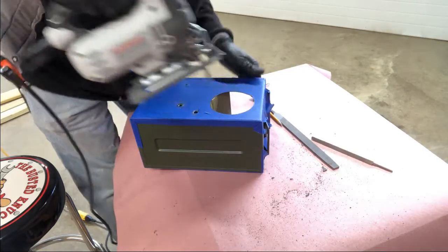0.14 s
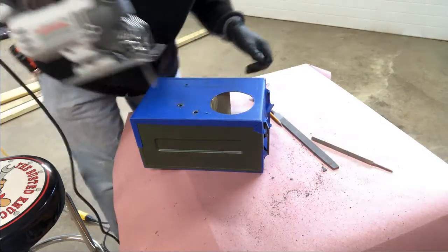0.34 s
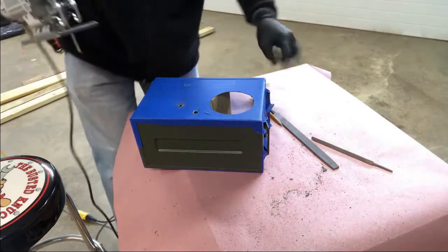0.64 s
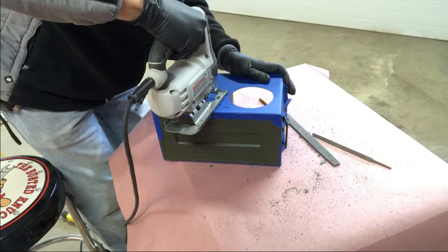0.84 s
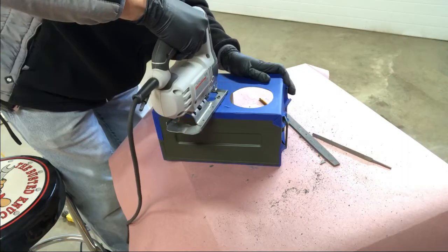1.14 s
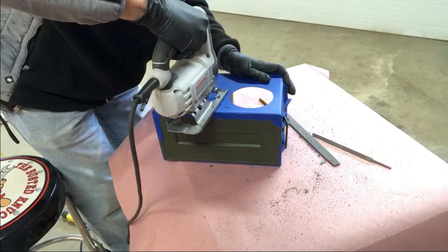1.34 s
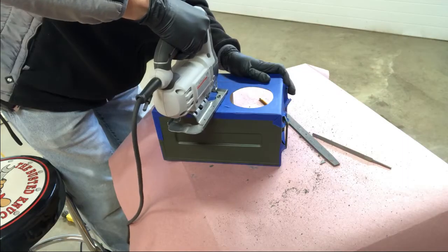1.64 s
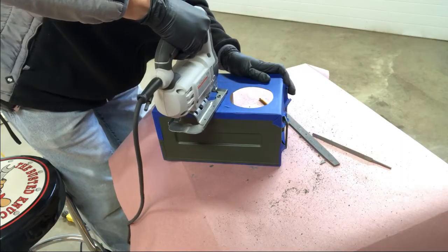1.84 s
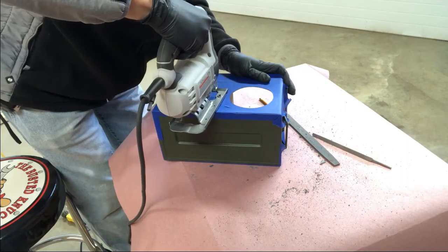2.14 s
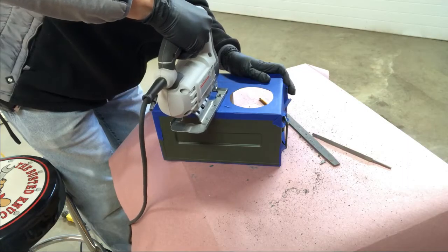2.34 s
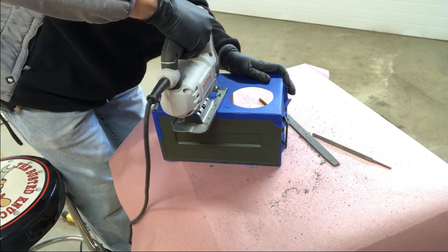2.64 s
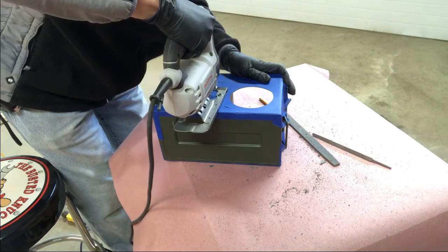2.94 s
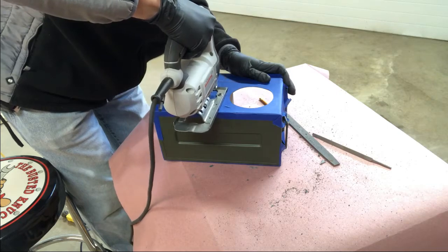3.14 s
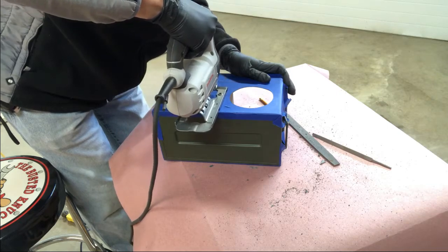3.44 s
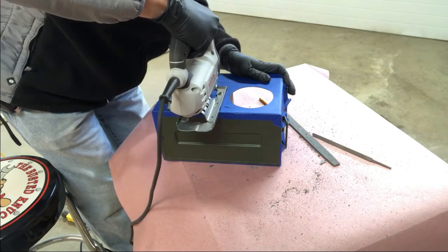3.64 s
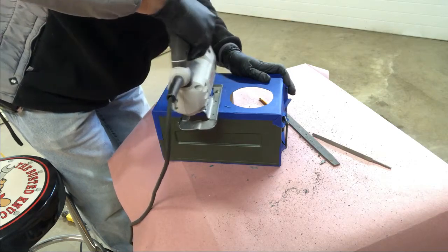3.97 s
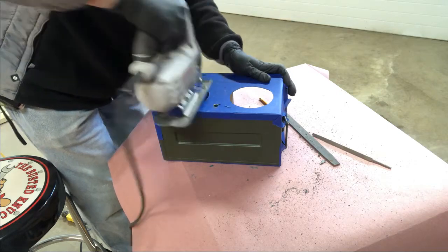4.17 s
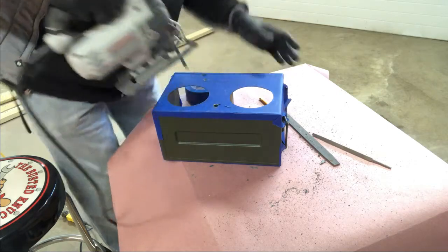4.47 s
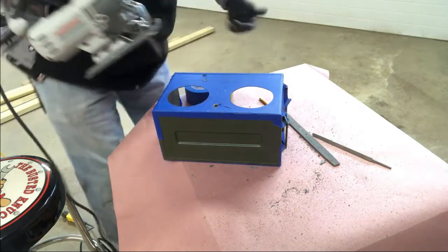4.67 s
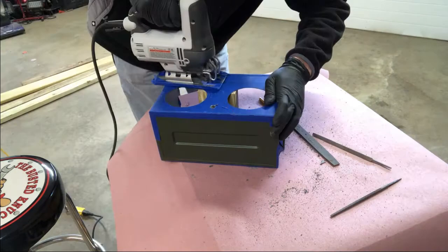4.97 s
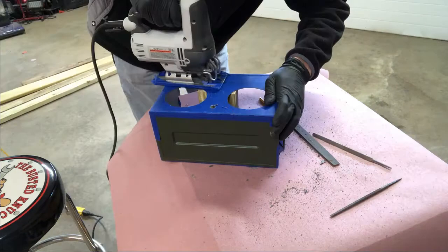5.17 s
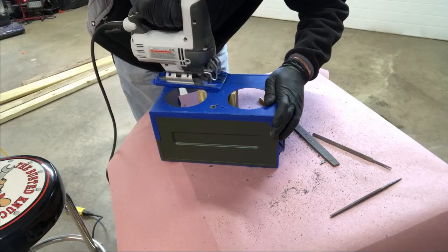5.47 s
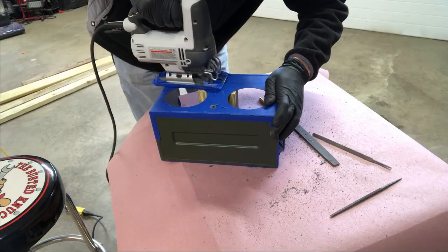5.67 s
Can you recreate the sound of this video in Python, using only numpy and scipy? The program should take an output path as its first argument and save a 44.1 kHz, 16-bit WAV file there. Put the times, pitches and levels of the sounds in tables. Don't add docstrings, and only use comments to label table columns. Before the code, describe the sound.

A corded jigsaw winds down with ticking and dry squeal, then buzzes loudly through a thin steel box in three hard-joined bursts, coasting once more between.

```python
import sys
import numpy as np
from scipy import signal
from scipy.fft import rfft, irfft, next_fast_len
from scipy.io import wavfile
from scipy.ndimage import uniform_filter1d

SR = 44100
rng = np.random.default_rng(int(sys.argv[2]) if len(sys.argv) > 2 else 0)


def materialize(psi):
    bounded = np.clip(np.atleast_2d(psi).T, -1, 1)
    quanta = np.round(bounded * 32767).astype(np.int16)
    wavfile.write(sys.argv[1], SR, quanta)


def gain_from_decibels(decibels):
    exponent = np.asarray(decibels, float) / 20
    return 10 ** exponent


N = 256220

# start_s, strokes_hz, feed_db
FEED_A = [(.76, 42.9, 0.5), (.88, 42.6, .3), (.966, 42.4, 0), (1.37, 42.25, -1.5), (1.648, 42.42, -3),
          (1.8, 42.6, -2), (2.144, 42.7, -1.5), (2.456, 42.5, -2.5), (2.558, 42.7, -5.5), (2.575, 42.7, -4)]
LAYERS_A = (-55.5, -44, -45.5, -44.5)
# pitch_hz, width_hz, level_db
BOX_A = [(465.2, 15.6, -8), (826, 37, -12), (1090, 50, -8), (1500, 100, -7.5), (1666, 120, -3.5),
         (1810, 82, -2), (2180, 120, -6.5), (2740, 120, -3), (3210, 94, -9), (4280, 66, -9),
         (5090, 370, -13.5), (7850, 320, -15.5), (10400, 440, -18), (14700, 500, -17)]
# pitch_hz, level_db (per Hz)
SHEET_A = [(24, -66), (40, -49.5), (392, -16.5), (467, -23.5), (680, -28.5), (1720, 2.5), (2380, -20.5),
           (2770, -4), (3650, -10), (7730, -14), (16000, -24)]
# stroke_place (0-1), boom_db, sheet_ring_db, upper_ring_db
BITES_A = [(.02, 0, -6, 1), (.11, -2, 4, -5), (.37, 0, 1, -4), (.45, -5.5, -1, -.5), (.57, 5, -1, -5),
           (.7, 3, 0, -6), (.87, -8, .5, -2), (.94, -8, -8, 1.5)]
# stroke_place (0-1), pitch_hz, rise_ms, level_db (re the ring of its range)
STRIKES_A = [(.04, 1730, 1.6, 8.5), (.87, 2725, 2.6, 10.5), (.05, 1500, 1.7, 5), (.41, 3300, 1.4, 1),
             (.39, 2200, 1.2, 2), (.47, 1850, 1.3, 3)]
# stroke_place (0-1), width (0-1 stroke), level_db
SPRAY_A = [
    (.44, 0.13, 8.5),
    (.99, 0.2, 9),
]
# centre_s, width_s, pitch_hz, width_hz, level_db
SHIFTS_A = [(.78, 0.092, 1820, 130, -8), (2, 0.46, 1790, 120, -3), (.95, 0.34, 1470, 160, 5),
            (2.8, .45, 1540, 160, -5.5), (0.87, 0.42, 1340, 180, -5), (1.2, 0.3, 1105, 90, 4.5),
            (2.1, .45, 1090, 60, -2.5), (2.53, .04, 300, 400, 4), (.748, .012, 1700, 2000, -4),
            (2.44, .15, 830, 100, 3.5), (1.74, .05, 790, 60, 8), (2.33, 0.4, 2080, 220, 4),
            (2.1, 0.21, 2800, 290, -1.5), (1.4, 0.22, 2720, 250, 1.5), (0.96, 0.17, 460, 100, 4),
            (1.8, 0.15, 430, 76, -3), (2.26, 0.07, 3270, 180, 3.5), (1.3, .4, 280, 190, -4),
            (2.1, .3, 140, 80, 3), (2.45, .08, 1150, 300, 4), (2.4, .12, 2750, 300, 3)]
# pitch_hz, width_hz, [(stroke_place (0-1), level_db)]
SWELLS_A = [(1000, 500, [(.2, 4), (.9, -6), (.62, -3)]), (1450, 250, [(.68, -5), (.42, -3)]),
            (1800, 300, [(.48, -5), (.62, 3)]), (2750, 450, [(.44, -6), (.98, 2)]), (3250, 400, [(.49, -3)]),
            (12000, 6000, [(.42, 2.5), (.17, -2)])]
# multiple (of stroke rate), level_db
THUMP_A = [(1, -37), (2, -65), (3, -13), (4, -24), (5, -5), (6, -6.5), (7, -9), (8, -5), (9, -24),
           (10, -7.5), (11, 6), (42, 4)]


def first_cut():
    return cut(.7455, 2.586, FEED_A, LAYERS_A, BOX_A, SHEET_A, BITES_A, STRIKES_A, SPRAY_A, SHIFTS_A,
               SWELLS_A, THUMP_A, thump_db=-6.5, alike=0.65, between=.33, under_db=-5.5)


# start_s, strokes_hz, feed_db
FEED_B = [(2.595, 42.5, -1.5), (2.663, 42.87, 0.5), (2.827, 42.87, -0.5), (2.953, 42.83, 0.2),
          (3.319, 42.87, -1.3), (3.531, 43.25, -5), (3.59, 43.58, -8), (3.629, 43.16, -18),
          (3.68, 42.85, -26)]
LAYERS_B = (-53.5, -41, -46, -43)
# pitch_hz, width_hz, level_db
BOX_B = [(440, 23, -7), (1197, 32, -9), (1470, 40, -3), (1758, 29, -2), (2250, 21, -8), (2520, 110, -20),
         (2736, 88, -10), (3114, 26, -3), (3970, 260, -13), (5120, 310, -12), (6780, 110, -26),
         (8500, 150, -25), (10100, 290, -19), (14800, 300, -24)]
# pitch_hz, level_db (per Hz)
SHEET_B = [(24, -89), (40, -65), (363, -6.5), (422, -3.5), (600, -15), (1180, -7.5), (1340, -21),
           (1810, -2), (2380, -11.5), (5180, -12), (16000, -21.5)]
# stroke_place (0-1), boom_db, sheet_ring_db, upper_ring_db
BITES_B = [(.03, 2, -3, -2.5), (.09, .5, -1, -9), (.18, -6, 5, -5), (.34, 1.5, 2.5, -6),
           (.48, -3.5, -1, -8), (.68, -9, -6, -1), (.78, -9, 2, 0), (.9, -3, 7, 0)]
# stroke_place (0-1), pitch_hz, rise_ms, level_db (re the ring of its range)
STRIKES_B = [(.1, 1480, 1.5, 5), (.83, 1760, 1.5, 3), (.84, 1480, 1.3, 3), (.29, 1780, 1.4, 3),
             (.72, 5200, 1.3, -2), (.72, 3150, 1.3, -2)]
# stroke_place (0-1), width (0-1 stroke), level_db
SPRAY_B = [
    (.21, 0.071, 6.8),
    (.77, 0.11, 6.9),
]
# centre_s, width_s, pitch_hz, width_hz, level_db
SHIFTS_B = [(2.74, 0.14, 1210, 190, 2), (3.43, .08, 1220, 250, 4.5), (2.85, .3, 1770, 90, -5.5),
            (3.5, .15, 1770, 90, -3), (3.15, .3, 1456, 70, 5), (3.2, .12, 560, 150, -3),
            (2.6, 0.12, 2260, 250, 3.5), (3.37, 0.25, 3120, 180, -4.5), (3.07, 0.4, 440, 120, -2.5),
            (3.46, 0.11, 410, 100, 5.5), (2.66, .1, 1460, 250, -3), (3.1, .6, 110, 90, -6),
            (2.64, .08, 240, 100, 5), (3.4, .15, 320, 100, 3), (2.62, .06, 3120, 150, -5)]
# pitch_hz, width_hz, [(stroke_place (0-1), level_db)]
SWELLS_B = [(440, 350, [(.06, 3), (.89, -6), (.56, -3)]), (1000, 500, [(.53, -6), (.14, 2)]),
            (1450, 250, [(.41, -9), (.12, 4), (.94, -3), (.75, 2)]), (1800, 300, [(.96, -7), (.57, 8),
            (.2, 4), (.72, 3)]), (2750, 450, [(.18, -4), (.44, 5), (.76, -5)])]
# multiple (of stroke rate), level_db
THUMP_B = [(1, -47), (2, -42), (3, -34), (4, -22), (5, -16), (6, -18), (7, -15), (8, -5), (9, -9), (10, 8),
           (11, 8.5), (28, -9), (34, 5.5), (41, 0), (43, -2), (73, -4)]


def second_cut():
    return cut(2.586, 3.68, FEED_B, LAYERS_B, BOX_B, SHEET_B, BITES_B, STRIKES_B, SPRAY_B, SHIFTS_B,
               SWELLS_B, THUMP_B, thump_db=-6.0, alike=0.82, between=0.45, under_db=-6.5)


# start_s, strokes_hz, feed_db
FEED_C = [(4.925, 30.34, 0.55), (5.001, 30.28, -.5), (5.227, 30.35, 0.074), (5.4, 30.41, -0.048),
          (5.79, 30.12, -.3)]
LAYERS_C = (-48.5, -39, -41.5, -41)
# pitch_hz, width_hz, level_db
BOX_C = [(342, 22, -3), (818, 26, -9), (995, 27, -5), (1382, 21, 1.5), (1587, 77, -2), (1983, 53, -4.5),
         (2210, 37, -13.5), (2626, 66, -12.5), (3150, 96, -13.5), (3400, 56, -16), (4450, 110, -15),
         (4980, 94, -13), (6070, 340, -17), (7690, 340, -17)]
# pitch_hz, level_db (per Hz)
SHEET_C = [(24, -70), (40, -41), (204, -8.5), (467, -3), (570, -17), (831, -1.5), (1090, -11.5), (1590, 0),
           (1810, -13.5), (3140, -12), (16000, -19.5)]
# stroke_place (0-1), boom_db, sheet_ring_db, upper_ring_db
BITES_C = [(.08, 6.5, -1, -2.5), (.2, -1, 1, -3), (.3, 12.5, 7.5, 3), (.4, 3, 3.5, 3), (.55, 4.5, 3.5, 1),
           (.68, -15, -5, -5), (.78, -14, -3, -1), (.87, -6, -4, 4.5)]
# stroke_place (0-1), pitch_hz, rise_ms, level_db (re the ring of its range)
STRIKES_C = [(.26, 1390, 1.6, 0), (.25, 1600, 2.4, 4), (.33, 990, 2, 0), (.83, 3200, 1.1, 0),
             (.5, 1590, 2, 2)]
# stroke_place (0-1), width (0-1 stroke), level_db
SPRAY_C = [
    (.38, 0.067, 8.1),
    (.79, 0.059, 8.6),
    (.96, .05, 6.1),
]
# centre_s, width_s, pitch_hz, width_hz, level_db
SHIFTS_C = [(4.98, .12, 980, 160, -2), (5.26, 0.44, 675, 140, 3), (5.7, .6, 330, 97, -4),
            (5.67, 0.16, 1800, 130, -10), (5.35, .18, 1600, 90, 4), (5.7, .08, 1600, 120, -3),
            (5.5, .3, 995, 90, 2.5), (5.3, .6, 150, 60, 2.5), (5, .1, 1900, 200, -3),
            (5.5, .2, 2040, 180, -2), (5.2, 0.39, 830, 110, -1.5), (5.7, .12, 845, 100, -4),
            (5.4, .15, 1750, 400, 3)]
# pitch_hz, width_hz, [(stroke_place (0-1), level_db)]
SWELLS_C = [(950, 500, [(.5, 4), (.63, 3), (.84, -5), (.99, 4)]), (1450, 250, [(.22, 3), (.37, -3), (.87, -4),
            (.04, 3)]), (1800, 300, [(.27, 3), (.6, -6), (.46, 4)]), (2750, 450, [(.22, 5), (.35, -4),
            (.5, 5), (.88, -2)]), (3250, 400, [(.09, -7), (.36, 3), (.6, -8), (.93, -4)]),
            (6000, 4000, [(.21, 3)]), (12000, 6000, [(.6, -2), (.78, 2.5), (.1, -3)])]
# multiple (of stroke rate), level_db
THUMP_C = [(1, -28), (2, -13), (3, -22), (4, -20), (5, -4.5), (6, -15), (7, -3), (8, -15), (9, -32),
           (10, -10), (11, 1.5), (12, -13), (13, -18), (28, -13), (45, -1.5), (46, 0.5), (53, 0)]


def third_cut():
    return cut(4.912, 5.82, FEED_C, LAYERS_C, BOX_C, SHEET_C, BITES_C, STRIKES_C, SPRAY_C, SHIFTS_C,
               SWELLS_C, THUMP_C, thump_db=-4.5, alike=0.68, between=0.52, under_db=-6.5)


BANDS_HZ = (110, 700, 2200, 4000, 17000)


def cut(t0, t1, rows, layers, box, sheet, bites, struck, spray, shifts, swells, thump,
        thump_db, alike, between, under_db):
    t = seconds(t0, t1)
    rate, levels = feed(rows, layers, t)
    phase = np.cumsum(rate) / SR
    places = round(SR / rate.mean())
    teeth = colour(blade_teeth(phase, places, alike), sheet, box, under_db)
    wander = phase + 0.0046 * drift(len(t), 3.5)
    chips = colour(chip_spray(wander, spray), sheet, box, under_db)
    shot = np.zeros(len(t))
    bite_width, fresh_chips = (.04, .032, .038, .03), (.55, .36, .5, 4.0)
    for k, (width, fresh) in enumerate(zip(bite_width, fresh_chips)):
        low, high = BANDS_HZ[k:k + 2]
        bite_rows = [(bite[0], width, gain_from_decibels(bite[min(k, 2) + 1])) for bite in bites]
        gate = between + humps(wander, bite_rows)
        ring = rms_one(gate * evened(band(teeth, low, high), size=places // 8))
        layer = band(ring + fresh * band(chips, low / 2, high), low * 0.79, high * 1.156)
        shot += gain_from_decibels(levels[k]) * evened(layer, size=2 * places)
    shot += strikes(phase, rate, levels, struck)
    shot += shoe_thumps(t, phase, levels, thump, thump_db, struck[0][0])
    return placed(shifted(swelling(shot, phase, swells), t, shifts), t)


def blade_teeth(phase, places, alike):
    alike = np.clip(alike, 0, .98)
    draws = rng.standard_normal((100, 1500))
    wear = rfft(draws[0, :places])
    wear = rms_one(irfft(wear / np.abs(wear), places))
    teeth = signal.lfilter([np.sqrt(1 - alike ** 2)], [1, -alike], draws[:, :places], axis=0)[15:]
    teeth += 1.4 * wear
    return teeth[phase.astype(int), (phase % 1 * places).astype(int)]


def chip_spray(wander, spray):
    size = len(wander)
    chips = rng.standard_normal(size) * gain_from_decibels(humps(wander, spray) + 0.76 * drift(size, 89.8))
    return chips * gain_from_decibels(2.44 * np.minimum(rng.exponential(1, size), 5))


def strikes(phase, rate, levels, rows):
    out = 0
    for (at, hz, rise_ms, db), chance in zip(rows, rng.standard_normal((8, 2, 100))):
        stroke, since = np.divmod(phase - at + 1, 1)
        uneven, detune = chance[:, stroke.astype(int)]
        since = since / rate
        rises = since / rise_ms * 1000
        swell = (rises * np.exp(1 - rises)) ** 2
        ring_db = levels[1 if hz <= BANDS_HZ[2] else 2]
        tone = np.sin(2 * np.pi * hz * since + 0.42 * detune)
        out = out + gain_from_decibels(ring_db + db + 1.1 * uneven) * swell * tone
    return out


def shoe_thumps(t, phase, levels, thump, thump_db, first_strike):
    throb = .6 * np.cos(2 * np.pi * (phase - first_strike))
    out = 0
    for (k, db), start in zip(thump, rng.random(30)):
        locked = k >= 20
        level_db = levels[1 if locked else 0] + db + thump_db + 2.64 * drift(len(t), 4.45)
        out = out + gain_from_decibels(level_db) * (1 + locked * throb) * np.sin(2 * np.pi * (k * phase + start))
    return out


FOLLOWS = (0.74, 0.88, 0.97, 0.83)
# centre_s, width_s, boom_db, sheet_ring_db, upper_ring_db (if it changes)
JUDDERS = [
    (0.882, 0.024, 3.1, 0.8),
    (2, 0.33, 2.5, -0.2),
    (2, 0.087, -0.5, 1.5),
    (2.5, 0.03, -13, 0),
    (2.5, 0.06, 6.5, -1),
    (3.59, 0.044, 8.1, 2.9),
    (2.5, 0.15, .3, 1, -5),
    (2, 0.23, -0.5, -2),
    (5, 1, 0, -1),
]


def feed(rows, layers, t):
    rate, press_db = in_time(rows, t)
    levels = [db + share * press_db for db, share in zip(layers, FOLLOWS)]
    for s, width, *extra_db in JUDDERS:
        for k, db in enumerate(extra_db):
            levels[k] = levels[k] + db * np.exp(-.5 * ((t - s) / width) ** 2)
    return rate, levels


def swelling(x, phase, rows):
    for hz, width_hz, places in rows:
        gain_db = humps(phase, [(at, .045, db) for at, db in places])
        x = x + (gain_from_decibels(gain_db) - 1) * resonance(x, hz, width_hz)
    return x


def shifted(x, t, rows):
    for s, width, hz, width_hz, db in rows:
        gain_db = db * np.exp(-.5 * ((t - s) / width) ** 2)
        x = x + (gain_from_decibels(gain_db) - 1) * resonance(x, hz, width_hz)
    return x


def working_gear():
    t = seconds(.7455, 2.586)
    strokes = np.cumsum(in_time(FEED_A, t)[0]) / SR
    return placed(whine(t, strokes, -70.0, rough=0.65), t)


# start_db, slope_db_per_s
COAST_A = [
    (-46.5, -16),
    (-10, -12),
    (-73, -10),
    (-54, -9),
]
# pitch_hz, level_db (per Hz)
MOTOR_A = [(24, -72), (40, -51), (297, -15), (363, -15.5), (770, -8), (1020, -13), (1630, -4), (2100, -8),
           (3650, -6), (4340, -8.5), (8990, -13), (12500, -14), (16000, -19)]
# start_s, end_s, from_hz, to_hz, level_db
RUBS_A = [(-.15, .18, 4300, 3480, -52), (.18, .3, 3500, 3350, -62), (0.4, 0.66, 7200, 8200, -64),
          (0.69, 0.74, 7100, 6300, -62), (.585, 0.624, 7200, 6100, -61), (.4, 0.49, 10500, 10300, -60),
          (0.5, 0.51, 10400, 10300, -59), (.39, 0.5, 8900, 7700, -64), (.485, .52, 9400, 7100, -65),
          (-.1, 0.3, 9800, 9900, -62), (-.05, .3, 7850, 7700, -61)]


def first_coast():
    t = seconds(0, .7455)
    at = np.array(KNOCKS)[:, 0]
    strokes = np.polyval(np.polyfit(at, np.arange(len(at)), 3), t)
    return coast(COAST_A, t, t, 1, strokes, MOTOR_A, RUBS_A, throb_db=5.7, squeal_throb_db=24.0,
                 bright_db=6.0, under_db=19.0)


# start_db, slope_db_per_s
COAST_B = [
    (-53.2, -3.2),
    (-7, -4),
    (-64.5, -3),
    (-81, 14),
]
# pitch_hz, level_db (per Hz)
MOTOR_B = [(24, -90), (40, -58), (363, -8.5), (585, -7.5), (680, -4.5), (1070, -3.5), (1590, -11),
           (2000, -5), (2260, -3.5), (4130, -1.5), (7360, -15.5), (9690, -10), (16000, -19.5)]
# start_s, end_s, from_hz, to_hz, level_db
RUBS_B = [
    (3.62, 3.93, 410, 375, -63),
    (3.86, 4.05, 10000, 9400, -65),
    (4.6, 4.78, 4600, 4200, -61),
    (3.9, 4.45, 4250, 4050, -62),
    (3.64, 4.2, 1100, 960, -62.5),
    (4.19, 4.37, 700, 680, -67),
]
# centre_s, width_s, pitch_hz, width_hz, level_db
SHIFTS_COAST = [
    (3.72, .08, 1100, 400, 3),
    (3.7, .07, 200, 200, 5),
    (4.15, .2, 220, 250, -5),
    (4.55, .15, 450, 300, 4),
    (4.75, .2, 1050, 400, -5),
    (4.75, .15, 2900, 1000, -2),
    (4.6, .25, 7750, 400, 6),
    (4.3, .06, 9600, 400, 4),
    (3.9, .2, 90, 80, -6),
]


def second_coast():
    t = seconds(2.586, 4.912)
    since = np.maximum(t - 3.669, 0)
    mesh_hz, friction_hz, drag_per_s = 2935, 1325, .416
    mesh_hz = (mesh_hz + friction_hz) * np.exp(-drag_per_s * since) - friction_hz
    strokes = np.cumsum(mesh_hz) / SR / MESH_PER_STROKE + .07
    dry_from_s, dry_rise_s = 4.412, .012
    dry_guide = np.clip((t - dry_from_s) / dry_rise_s, 0, 1)
    x = coast(COAST_B, t, since, dry_guide, strokes, MOTOR_B, RUBS_B, throb_db=2.0 + 2.8 * since,
              squeal_throb_db=21.0, bright_db=3.0, under_db=4.5)
    return shifted(x, seconds(0, 6), SHIFTS_COAST)


def coast(rows, t, since, dry_guide, strokes, motor, rubs, throb_db, squeal_throb_db, bright_db, under_db):
    motor_db, low_db, whine_db, squeal_db = [db + slope * since for db, slope in rows]
    half = (2 * strokes) % 1
    travel = np.minimum(half / 0.048, 1) * (1 - half ** 1.8)
    travel = travel * (1 + 0.051 * np.cos(2 * np.pi * strokes - .8))
    air = colour(rng.standard_normal(len(t)), motor, HOUSING, under_db)
    brightness = gain_from_decibels(bright_db * (.5 - strokes % 1))
    air += (brightness - 1) * resonance(air, 11500.0, 7000.0)
    x = gain_from_decibels(motor_db) * rms_one(gain_from_decibels(throb_db * travel) * band(air, low=900, high=17000))
    x += gain_from_decibels(motor_db + low_db) * band(air, 16, 785)
    x += dry_guide * guide_squeal(t, strokes, squeal_db, squeal_throb_db)
    for rub in rubs:
        x += gliding_tone(t, strokes, *rub)
    return placed(x + whine(t, strokes, whine_db, rough=.65), t)


MESH_PER_STROKE = 68.4
# pitch_hz, width_hz, level_db
HOUSING = [(700, 200, -8), (1000, 330, -7), (1550, 300, 2), (1900, 300, 1), (2700, 260, -9),
           (4200, 350, -4), (5300, 800, -3), (6500, 400, -3), (7750, 250, -8), (8600, 500, -1),
           (9650, 300, -6)]
MESH_DB = (2.5, 0, 4.5)


def whine(t, strokes, level_db, rough):
    mesh_hz = MESH_PER_STROKE * np.gradient(strokes) * SR
    out = 0
    for k, db in enumerate(MESH_DB, 1):
        shake = 1 + rough * drift(len(t), 120.0) + .4 * np.cos(8 * np.pi * strokes)
        shake += .35 * np.cos(2 * np.pi * (strokes - .14))
        jitter = .5 * np.cumsum(drift(len(t), 250.0)) * 250 / SR
        turn = 2 * np.pi * k * MESH_PER_STROKE * strokes + jitter
        out = out + gain_from_decibels(db) * peaks_power(HOUSING, k * mesh_hz) ** 0.63 * shake * np.sin(turn)
    return gain_from_decibels(level_db) * out


# start_s, pitch_hz
SQUEAL = [
    (0, 13100),
    (.74, 13050),
    (4.4, 13200),
    (4.91, 12900),
]
# start_s, level_db
GRIP = [(0, 0), (.2, 0), (.24, -5), (.27, -3), (.31, 4), (.345, -2), (.38, 1), (.42, 4), (.46, -3), (.5, 5),
        (.55, -1), (.6, -3), (.64, -9), (.665, -2), (.71, -3), (.74, -1), (4.425, 6), (4.45, -7),
        (4.49, -3), (4.53, 1), (4.56, -5), (4.585, 2), (4.61, -4), (4.68, 1), (4.75, -3), (4.88, 2)]


def guide_squeal(t, strokes, level_db, depth_db):
    grip_db = in_time(GRIP, t)[0]
    pitch_hz = in_time(SQUEAL, t)[0]
    return gain_from_decibels(level_db + 0.5 + grip_db) * squeal(t, strokes, pitch_hz, 0.058, 0.015, depth_db)


def gliding_tone(t, strokes, start, end, from_hz, to_hz, level_db):
    along = np.clip((t - start) / (end - start), 0, 1)
    swell = np.sqrt(np.sin(np.pi * along) + 1e-9)
    pitch_hz = from_hz + (to_hz - from_hz) * along
    return gain_from_decibels(level_db) * swell * squeal(t, strokes, pitch_hz, .008, .014 + 70 / to_hz, 16.0)


def squeal(t, strokes, hz, wobble, scatter, depth_db):
    size = len(t)
    travel = np.abs(np.sin(2 * np.pi * strokes + 0.2 * drift(size, 11.0)))
    speed = np.tanh(2.2 * travel)
    pitch = hz * (1 - wobble * speed + scatter * drift(size, 900.0))
    flutter_db = 2 * drift(size, 110.0) + 1.6 * drift(size, 26.0) + 1.2 * drift(size, 11.0)
    grip = gain_from_decibels(1.3 * depth_db * .85 * speed + flutter_db)
    return rms_one(grip * np.sin(2 * np.pi * np.cumsum(pitch) / SR))


# start_s, level_db (peak)
KNOCKS = [(0.0218, -50), (0.0769, -36), (0.1362, -44), (0.1952, -40), (0.254, -30), (0.325, -32),
          (0.399, -38), (0.481, -35), (0.5734, -44), (0.68, -35)]
# start_s, level_db (peak)
TICKS = [
    (4.605, -43),
    (4.768, -47),
]


def knocks():
    out = np.zeros(N)
    events = KNOCKS + TICKS
    bursts = rng.standard_normal((len(events), 600)) * np.exp(-np.arange(600) / (0.0022 * SR))
    for (s, db), tick in zip(events, bursts):
        out[round(s * SR):][:600] += gain_from_decibels(db - 6.0) * tick
    return signal.sosfilt(signal.butter(2, [1200, 12000], "band", fs=SR, output="sos"), out)


# pitch_hz, level_db (per Hz)
ROOM = [(20, -25), (60, -15), (95, -12), (140, -7.5), (1000, -16), (16000, -27)]


def room_tone():
    return gain_from_decibels(-80) * rms_one(colour(rng.standard_normal(N), ROOM, [(95, 34, -16.0)], 0))


def rms_one(x):
    return x / np.sqrt(np.mean(x ** 2) + 1e-20)


def in_time(rows, t):
    s, *columns = np.transpose(rows)
    return [np.interp(t, s, c) for c in columns]


def seconds(t0, t1):
    return np.arange(round(t0 * SR), min(round(t1 * SR), N)) / SR


def placed(x, t):
    out = np.zeros(N)
    out[round(t[0] * SR):][:len(t)] = x
    return out


def peaks_power(peaks, hz):
    return sum(gain_from_decibels(2 * db) / (1 + (2 * (hz - f) / w) ** 2) for f, w, db in peaks)


def colour(x, spectrum, peaks, under_db):
    n = 2 * next_fast_len(len(x) // 2 + 4096)
    hz = np.maximum(np.arange(n // 2 + 1) * SR / n, 1)
    f, db = np.transpose(spectrum)
    broad = gain_from_decibels(2 * np.interp(np.log(hz), np.log(f), db))
    skirt = np.minimum(1, broad * gain_from_decibels(34.5))
    power = broad * gain_from_decibels(2 * under_db) + skirt * peaks_power(peaks, hz)
    cepstrum = irfft(.5 * np.log(power), n)
    cepstrum[1:n // 2] *= 2
    cepstrum[n // 2 + 1:] = 0
    return irfft(rfft(x, n) * np.exp(rfft(cepstrum)), n)[:len(x)]


def band(x, low, high):
    return rms_one(signal.sosfilt(signal.butter(3, [low, high], "band", fs=SR, output="sos"), x))


def resonance(x, hz, width_hz):
    r = np.exp(-np.pi * width_hz / SR)
    poles = [1, -2 * r * np.cos(2 * np.pi * hz / SR), r * r]
    return signal.lfilter([(1 - r * r) / 2, 0, (r * r - 1) / 2], poles, x)


def drift(size, rate):
    knots = rng.standard_normal(int(size * 14 / SR) * 100 + 40)
    return np.interp(np.arange(size) * rate / SR, np.arange(len(knots)), knots) * 1.2


def humps(phase, rows):
    return sum(height * np.exp(-.5 * (((phase - at + .5) % 1 - .5) / w) ** 2) for at, w, height in rows)


def evened(x, size):
    power = uniform_filter1d(uniform_filter1d(x ** 2, size), size)
    return x / np.sqrt(power + 1e-12)


def scene():
    x = first_coast() + knocks()
    x += second_coast()
    x += first_cut()
    x += second_cut()
    x += third_cut()
    x += working_gear()
    room = room_tone()
    x = signal.sosfilt(signal.butter(3, 115, "high", fs=SR, output="sos"), x)
    return (x + room)[None]


def band_limit(x):
    return signal.sosfilt(signal.butter(12, 15810, fs=SR, output="sos"), x)


def record(dry):
    top = signal.ellip(12, .5, 70, 15790, fs=SR, output="sos")
    rounded = .12 * np.tanh(dry / .12)
    mix = signal.sosfilt(top, rounded)
    return band_limit(mix)


dry = scene()
out = record(dry)
materialize(out)
```